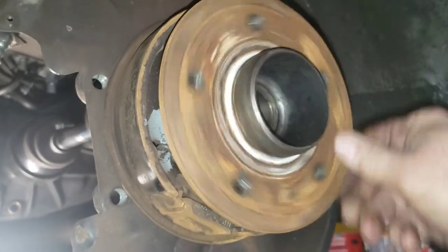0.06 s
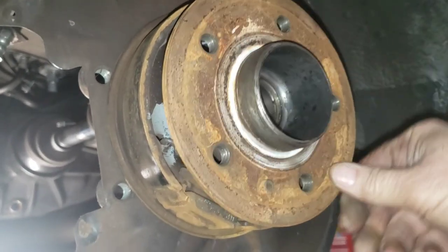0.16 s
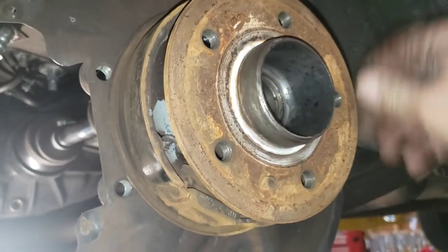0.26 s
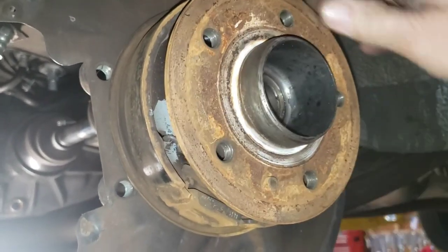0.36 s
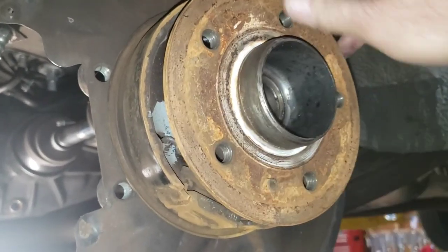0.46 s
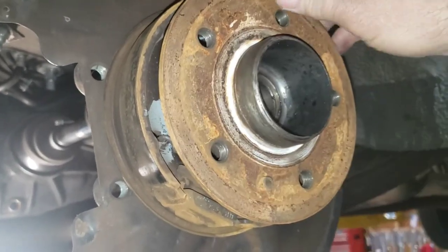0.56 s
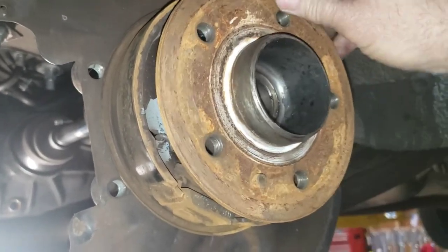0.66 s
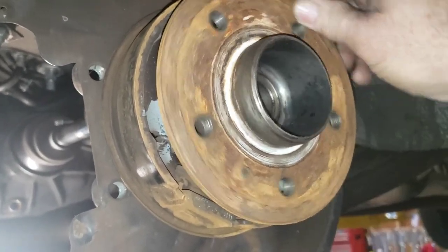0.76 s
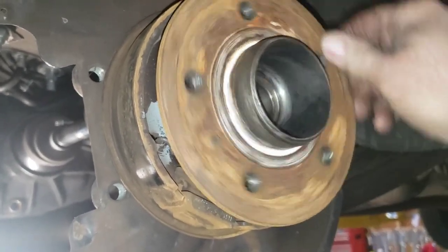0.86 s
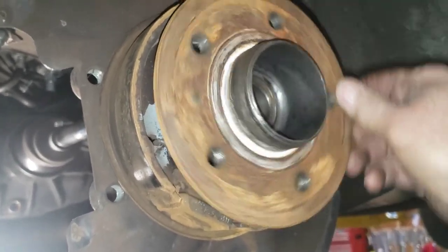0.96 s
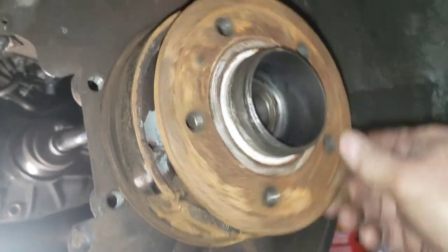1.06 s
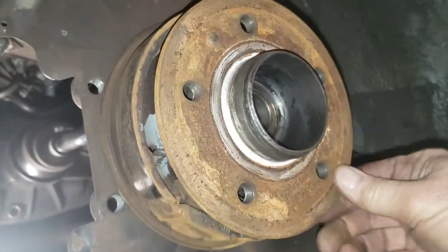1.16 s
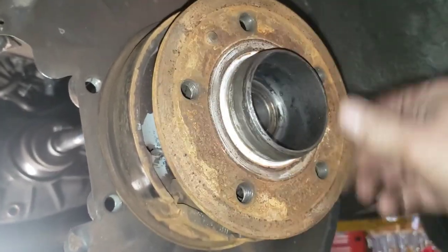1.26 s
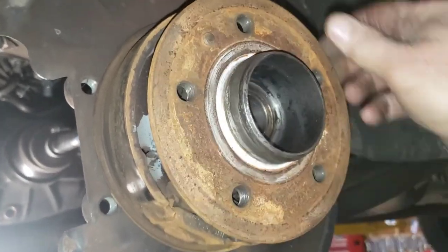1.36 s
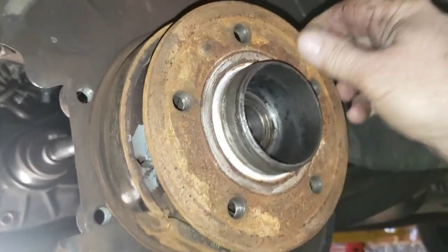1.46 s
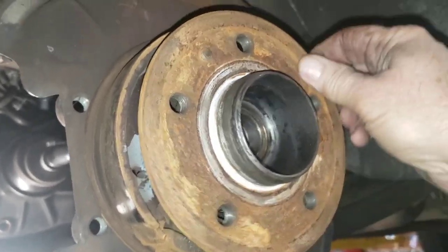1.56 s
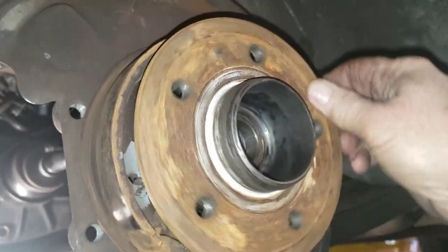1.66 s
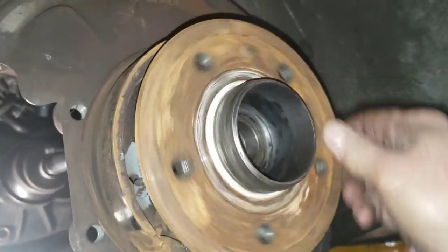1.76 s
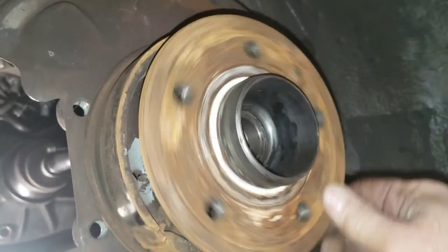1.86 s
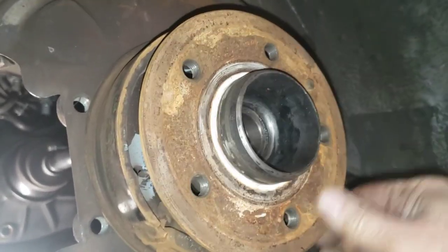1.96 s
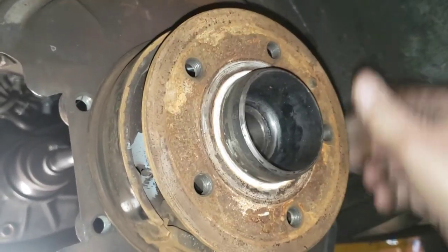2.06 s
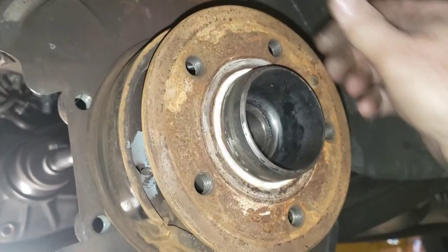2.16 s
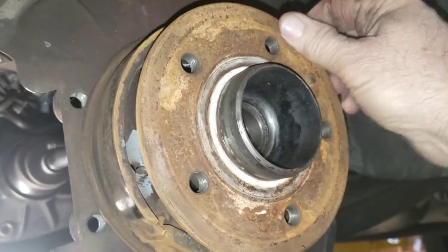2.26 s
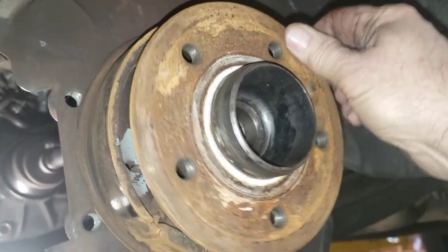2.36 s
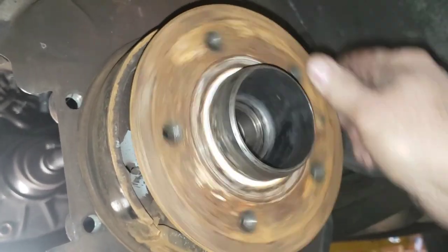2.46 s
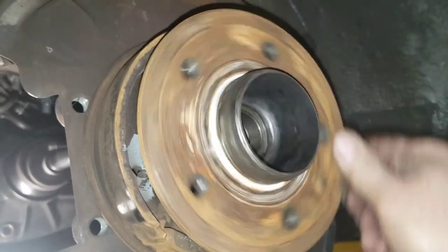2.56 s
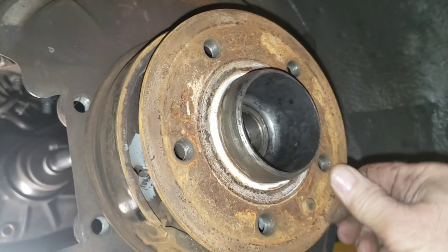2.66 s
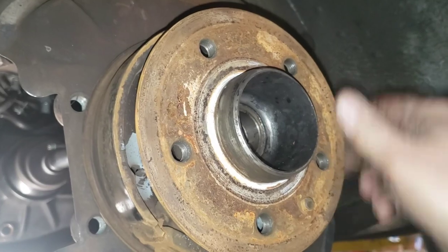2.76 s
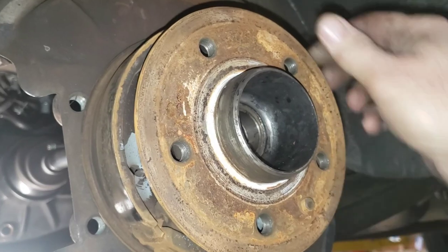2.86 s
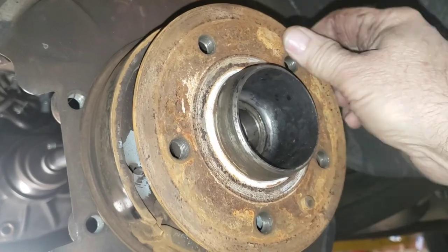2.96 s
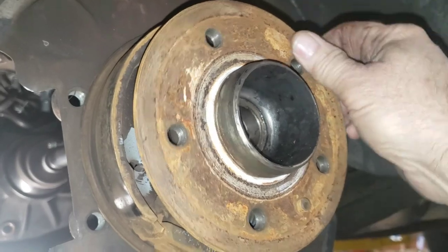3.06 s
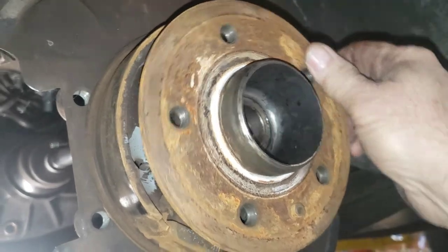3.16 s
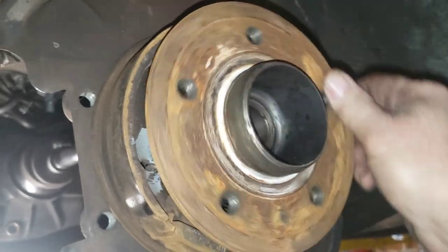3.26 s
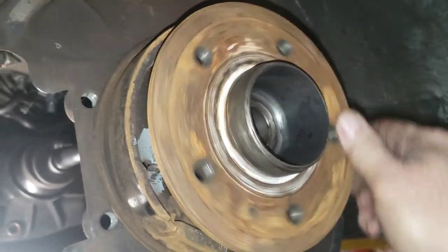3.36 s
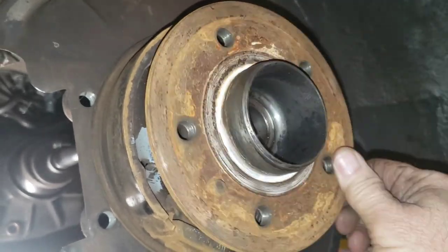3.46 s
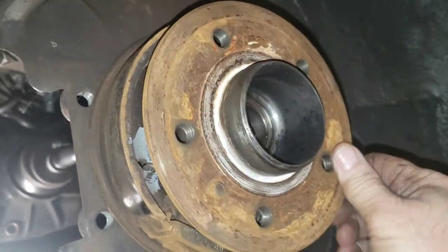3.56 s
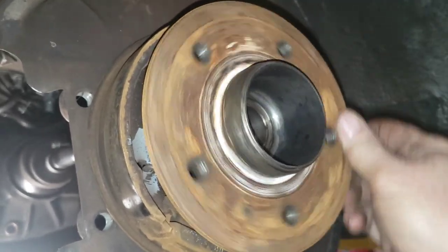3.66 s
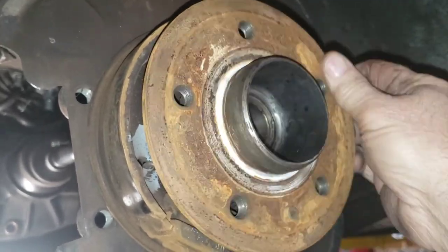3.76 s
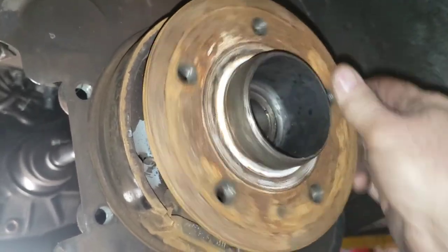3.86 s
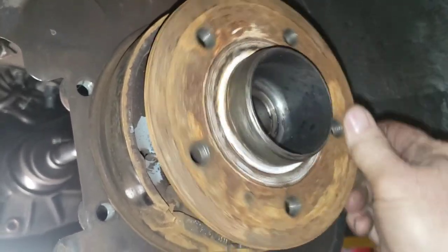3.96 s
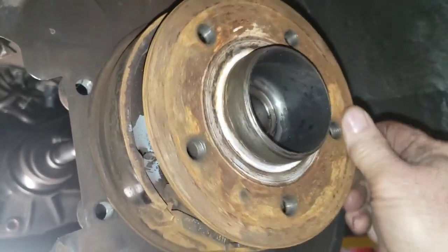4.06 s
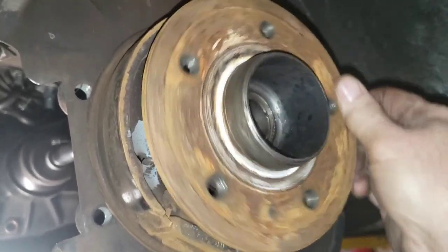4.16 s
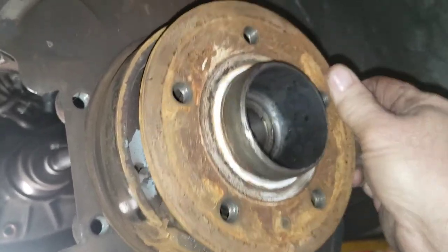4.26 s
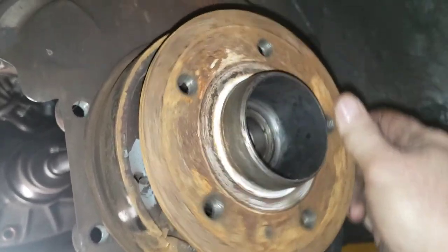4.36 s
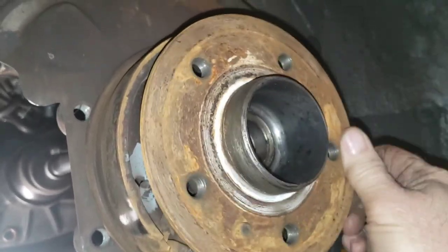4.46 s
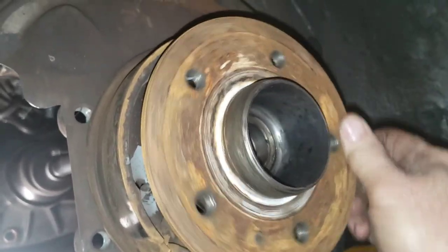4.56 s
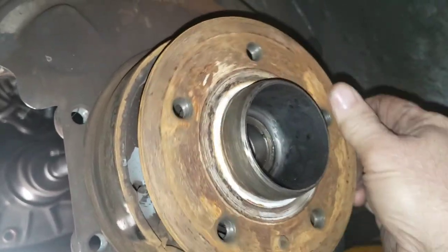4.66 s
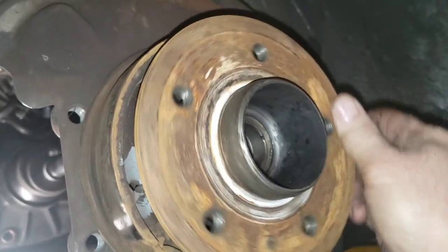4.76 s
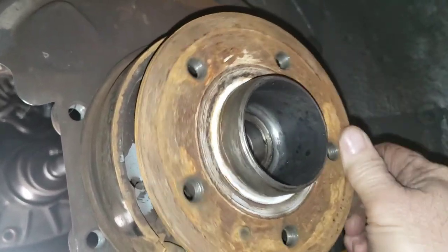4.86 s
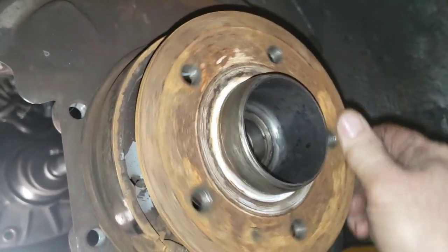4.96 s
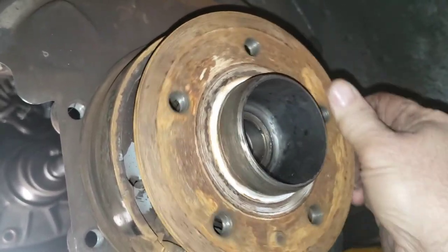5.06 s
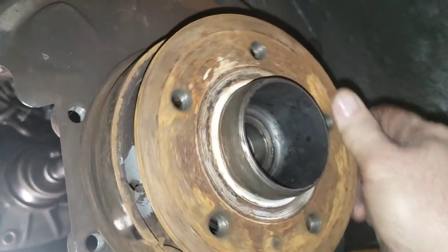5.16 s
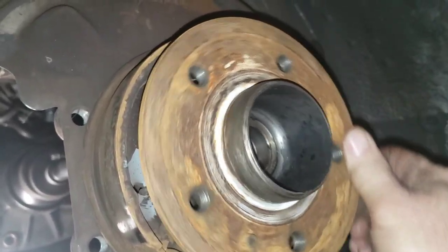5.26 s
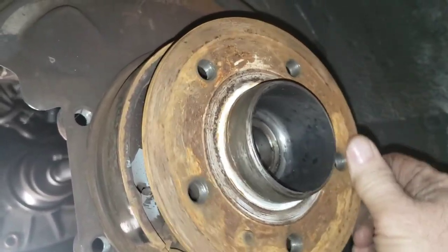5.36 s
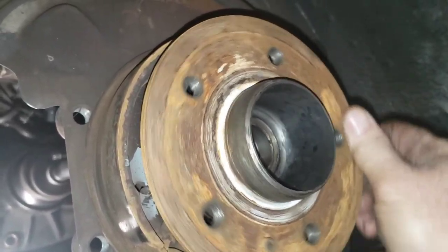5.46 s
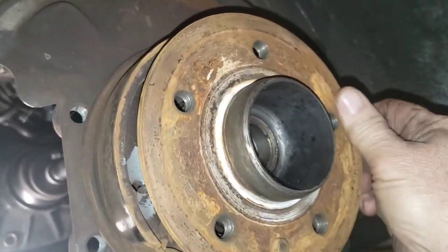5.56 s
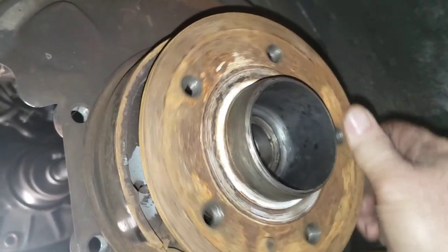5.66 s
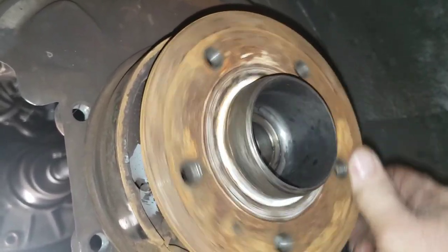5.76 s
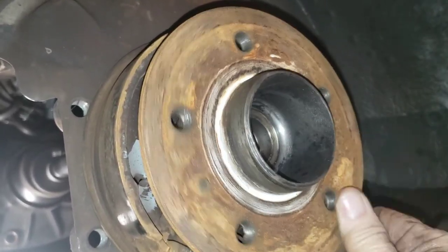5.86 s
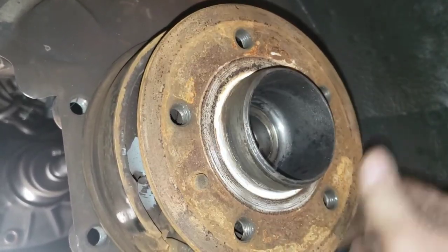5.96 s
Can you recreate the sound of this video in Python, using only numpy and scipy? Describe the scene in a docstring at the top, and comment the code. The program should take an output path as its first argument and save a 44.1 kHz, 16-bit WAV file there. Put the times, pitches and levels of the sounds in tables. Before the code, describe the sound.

A bare iron wheel hub is turned by hand on a worn bearing, heard close up in a garage with faint hiss and little echo. It opens with the loudest spin, a gritty grinding rumble with a squeak, fading by about 0.5 seconds. Light metallic ticks follow, then another spin near 0.9 seconds with ringing knocks and a low hum. Around 1.4 seconds a slow drag makes the metal sing thinly, ending in a small dry click. Further grinding bursts come at about 1.9 and 2.5 seconds, the second with sharp crunches and knocks, and single ticks fall in the gaps. From 3.2 seconds high squeaks lead into a strong stroke, and the hub is then rocked in short, quick turns, about four a second. These crunch, scrape and knock, with occasional soft low tones from the bracket, and continue a little more quietly from 5 seconds until about 6.

```python
"""In a garage, close to a two-port microphone, a hand rocks and spins a bare iron hub on a ruined bearing.
Pitted rollers rumble and grind grit, forcing the modes of the iron, and catch with crunches and squeaks.
Loose rollers tick the flange, which rings thinly; a slow drag makes it sing and a fingertip snaps on it.
Play in the bearing is taken up with knocks, and the bracket sways with low notes under a push."""
import sys
import numpy as np
from scipy import signal
from scipy.fft import rfft, irfft, next_fast_len
from scipy.io import wavfile
from scipy.ndimage import uniform_filter1d

SR = 44100
rng = np.random.default_rng(int(sys.argv[2]) if len(sys.argv) > 2 else 0)


def wav_record(signal):
    """Record a signal, one row per channel, as 16-bit PCM in the file named by sys.argv[1]."""
    frames = np.transpose(np.atleast_2d(signal))
    bounded = np.clip(frames, -1, 1)
    # unit amplitude maps onto the largest positive 16-bit level
    quanta = np.round(bounded * 32767).astype(np.int16)
    wavfile.write(sys.argv[1], SR, quanta)


N = 264452
T = np.arange(N) / SR


def gain_of(db):
    return 10 ** (np.asarray(db) / 20)


def unit_rms(x):
    return x / np.sqrt(np.mean(x ** 2) + 1e-20)


def curve_at(points, hz):
    point_hz, value = np.transpose(points)
    return np.interp(np.log(hz + 1), np.log(point_hz + 1), value)


def add(mix, start_s, sound):
    part = mix[:, round(start_s * SR):][:, :sound.shape[1]]
    part += sound[:, :part.shape[1]]


def resonate(x, hz, width_hz):
    """Damped resonance: one mode with a peak gain near 1."""
    radius = np.exp(-np.pi * width_hz / SR)
    pole = radius * np.exp(2j * np.pi * min(hz, 16000) / SR)
    return 2 * signal.lfilter([1 - radius], [1, -pole], x).real


def coloured(x, gain):
    """Linear filtering: the spectrum is multiplied by gain(hz)."""
    size = next_fast_len(N + SR)
    return irfft(rfft(x, size) * gain(np.fft.rfftfreq(size, 1 / SR)), size)[..., :N]


def stroke_level_db(t, offset_db, bright_share, fade_db_per_s, steepness):
    """Incoherent addition: hand strokes run up, hold and die away, and their powers sum."""
    # full_speed_s, hold_s, level_db, brightness_db, rise_db_per_s (at steepness 1)
    strokes = [(0.0, 0.12, -30, 2, 295), (0.541, 0.014, -69, -1, 211), (0.78, 0.086, -54.5, -6.5, 1200),
               (0.853, 0.15, -38, -1.5, 304), (1.102, 0.1, -54, -1.5, 181),
               (1.358, 0.059, -59.5, 11.5, 599), (1.805, 0.089, -55.5, 2, 222),
               (1.878, 0.078, -49.5, -2.5, 485), (2.469, 0.01, -60, -1, 149),
               (2.519, 0.11, -42.5, -1, 600.5), (3.078, 0.048, -66.5, 2.5, 407.5),
               (3.253, 0.11, -50, 2, 1500), (3.445, 0.028, -39, 2, 350), (3.74, 0.054, -43.5, -3.5, 326),
               (3.969, 0.067, -51.5, -3, 612), (4.1, 0.0093, -56.5, -5.5, 902),
               (4.22, 0.061, -46.5, -0.5, 885), (4.45, 0.032, -49.5, -2.5, 1190),
               (4.676, 0.043, -43.5, 1, 788.5), (4.884, 0.05, -53.5, -4, 297.5),
               (5.011, 0.14, -53.5, -6, 905), (5.23, 0.1, -53.5, -3.5, 291), (5.516, 0.093, -53.5, -4, 380),
               (5.714, 0.0033, -56, -5, 170), (5.82, 0.076, -61.5, -6, 213),
               (5.928, 0.0059, -51.5, -4.5, 262)]
    full_s, hold_s, level_db, bright_db, rise = np.transpose(strokes)[..., None]
    run_up_db = steepness * rise * np.maximum(full_s - t, 0)
    fade_db = fade_db_per_s * np.maximum(t - full_s - hold_s, 0)
    db = level_db + offset_db + bright_share * bright_db - run_up_db - fade_db
    return 10 * np.log10(np.sum(gain_of(2 * db), axis=0) + 1e-12)


def rolling(grains_per_s=16000, spread_db=1.3, clump_db=1.5, patchy_db=4,
            slips_per_s=45, slip_s=0.027, slip_size=0.41):
    """Shot noise: uneven grit is crushed in clumps at two sides of the race."""
    # Spectral shape of the grinding: frequency_hz, density_db
    spectrum = [(25, -29.5), (60, -22), (102, 7), (206, -2), (400, -3), (600, 9), (863, 7), (1100, 6.5),
                (1330, -4.5), (2300, -10), (2910, -14), (4490, -8.5), (8590, -17.5), (14400, -18.5),
                (16000, -24.5)]
    # Thud, growl, rumble, grinding, dry hiss: offset_db, bright_share, fade_db_per_s, steepness
    layers = [(-17.5, -2, 76.5, 0.65), (-9, -0.79, 81.5, 1.27), (-7, -0.83, 173.5, 0.91),
              (-3.5, 0.33, 196.5, 0.72), (-12.5, 0.67, 266, 0.9)]
    sizes = gain_of(spread_db * np.minimum(rng.exponential(1, N), 5))
    sizes *= rng.random(N) < grains_per_s / SR
    clumps = unit_rms(uniform_filter1d(uniform_filter1d(rng.standard_normal(N), 300), 300))
    grains = sizes * gain_of(clump_db * clumps) * rng.standard_normal((2, N))
    hz, t, frames = signal.stft(unit_rms(grains), SR, nperseg=512, noverlap=384)
    shape_db = curve_at(spectrum, hz)
    layer_index = np.interp(hz, [90, 170, 350, 520, 1200, 1600, 6000, 8000], [0, 1, 1, 2, 2, 3, 3, 4])
    level_db = np.zeros(frames.shape[1:])
    for k, layer in enumerate(layers):
        share = np.clip(1 - abs(layer_index - k), 0, 1)
        band_db = 10 * np.log10(np.mean((share > .5) * gain_of(2 * shape_db)))
        level_db += share[:, None] * (stroke_level_db(t, *layer) - band_db)
    # Small slips crackle in the treble.
    kicks = rng.exponential(slip_size, len(t)) * (rng.random(len(t)) < slips_per_s * t[1])
    slips = signal.lfilter([1], [1, -np.exp(-t[1] / slip_s)], kicks)
    level_db += np.clip(hz / 7000, 0, 1)[:, None] * 20 * np.log10(unit_rms(1 + slips))
    # The contact patch wanders, so its colour drifts.
    drift = uniform_filter1d(rng.standard_normal(level_db.T.shape), size=16, axis=0)
    patches = unit_rms(uniform_filter1d(drift, size=2, axis=1)).T
    level_db += patchy_db * np.clip(hz / 2500, .2, 1)[:, None] * patches
    frames = frames * gain_of(shape_db[:, None] + level_db)
    return signal.istft(frames, SR, nperseg=512, noverlap=384)[1][:, :N]


def hub(force, wander_db=2.5, speed_share=.3):
    """Forced vibration: iron modes ring over the contact noise, fed unevenly as the load moves round."""
    # Modes of hub, knuckle and bracket: pitch_hz
    pitches = [115, 161, 207, 255, 305, 551, 718, 789, 881, 1026, 1091, 1251, 1717, 2731, 3074, 3496, 3780,
               4489, 8150, 9300, 10833, 14100]
    # Resonance at each pitch: width_hz, gain_db
    modes = [(5, 8.5), (3.47, 11), (8, 7), (10, 10), (3, 7), (7, 6), (6, 7.5), (5, 10.5), (5, 14.5), (8, 8),
             (12.1, 13.5), (4.506, 13), (14, 5), (15.9, 8.5), (17.9, 4), (26.4, 9.5), (24, 4), (17.9, 5.5),
             (49.1, 5.5), (39.7, 6), (44.4, 17.5), (200, 5.5)]
    steps_s = np.arange(0, 6.2, .11)
    speed_db = speed_share * np.clip(stroke_level_db(steps_s, 45, 0, 170, 0.93), -20, 10)
    feeds = rng.standard_normal((len(modes), len(steps_s)))
    out = force.copy()
    for hz, (width_hz, db), feed in zip(pitches, modes, feeds):
        feed_db = wander_db * feed + (hz > 9000) * speed_db  # fast strokes wake the highest modes
        out += resonate(force * gain_of(db + np.interp(T, steps_s, feed_db)), hz, width_hz)
    return out


def room_noise(level_db=-67):
    """Noise floor: garage air and microphone hiss, partly correlated between the channels."""
    # frequency_hz, density_db
    spectrum = [(25, 18), (90, 9.5), (400, -26.5), (2000, -6.5), (5000, -22.5), (9000, -24.5),
                (12500, -15.5), (16000, -17)]
    common, separate = rng.standard_normal((2, N))
    noise = np.array([common, 0.36 * common + separate])
    return gain_of(level_db) * unit_rms(coloured(noise, lambda hz: gain_of(curve_at(spectrum, hz))))


def catches(trim_db=-10, scrape_q=10, crack_q=1.5, widest_hz=800, rise_s=.0016):
    """Stick-slip friction: a roller catching in a pit gives a pitched scrape inside a wide crack."""
    # start_s, level_db, pitch_hz, t60_s, crack_over_scrape_db
    events = [(0.077, -12.5, 2740, 0.064, -12.5), (0.172, -34.5, 11040, 0.077, 8.5),
              (0.7001, -51, 6070, 0.2, 3.5), (0.78, -56, 3640, 0.035, 10), (0.828, -37, 3600, 0.058, 9.5),
              (0.945, -27.5, 2320, 0.32, -6), (0.9358, -40, 4270, 0.056, 16),
              (1.314, -57.5, 4340, 0.044, 17), (1.8792, -31, 4960, 0.096, -1),
              (2.369, -54.5, 3980, 0.022, 19.5), (2.436, -51, 4300, 0.098, 7.5),
              (2.5105, -36.5, 7800, 0.081, 16.5), (2.5436, -24.5, 4400, 0.15, -2),
              (2.5754, -24.5, 4350, 0.049, 0.5), (2.6202, -34.5, 5270, 0.035, 4),
              (3.0642, -42.5, 4710, 0.081, -3), (3.2533, -32, 14000, 0.11, -1.5),
              (3.289, -20.5, 5070, 0.034, -26), (3.322, -19, 13400, 0.038, -23),
              (3.3781, -31, 3080, 0.1, 6), (3.414, -43, 7000, 0.048, 9), (3.4371, -19, 14800, 0.064, -19),
              (3.6603, -42, 4200, 0.14, -2), (3.7223, -44, 4830, 0.53, 10.5),
              (3.803, -45, 3830, 0.14, 13.5), (3.863, -39.5, 4300, 0.042, 10.5),
              (3.963, -34, 4730, 0.035, 1.5), (3.976, -26.5, 12400, 0.079, -31),
              (4.099, -41.5, 4700, 0.025, 6.5), (4.2246, -30, 6200, 0.085, 0.5),
              (4.451, -42.5, 3710, 0.22, 5), (4.651, -60, 11000, 0.5, 11), (4.6944, -39, 9400, 0.018, 21.5),
              (4.787, -48.5, 10600, 0.055, 14), (4.8755, -45, 3740, 0.051, 5),
              (4.916, -46, 10600, 0.053, -8), (4.964, -54, 10600, 0.049, 12),
              (5.0687, -44.5, 3840, 0.79, 7.5), (5.1334, -44.5, 3200, 0.06, 18),
              (5.5041, -36, 10530, 0.15, -13), (5.573, -38, 9000, 0.22, 5), (5.9118, -48, 4530, 0.22, 9),
              (5.9328, -35, 4640, 0.066, 1.5), (5.9661, -37.5, 4800, 0.14, 0.5)]
    out, t = np.zeros((2, N)), np.arange(8000) / SR
    for start_s, db, hz, t60, crack_db in events:
        scrape_noise, crack_noise = rng.standard_normal((2, 2, len(t)))
        envelope = (1 - np.exp(-t / rise_s)) * gain_of(db + trim_db - 60 * t / min(t60, .4))
        width_hz = min(hz / scrape_q, widest_hz)
        scrape = unit_rms(resonate(resonate(scrape_noise, hz, width_hz), hz, width_hz))
        crack = unit_rms(resonate(crack_noise, hz, hz / crack_q))
        add(out, start_s, envelope * (scrape + gain_of(crack_db) * crack))
    return out


def flange(force, shake_db=-14, rub_db=4, click_db=30, drag_db=10, rub_rise_s=0.00067, rub_s=0.029):
    """Lightly damped resonance: ticks rub the flange briefly, a drag for longer; grinding shakes it."""
    # Loose rollers ticking the flange: start_s, level_db
    ticks = [(0.19, -38.5), (0.503, -52.5), (0.597, -51.5), (0.755, -45), (1.263, -46.5), (2.016, -43.5),
             (2.2173, -50), (2.3033, -46.5), (2.7593, -42), (3.002, -47)]
    # The slow drag that keeps it singing: time_s, level_db
    drag_curve = [(1.345, -69), (1.365, -47), (1.435, -53.5), (1.465, -60), (1.532, -51)]
    # Flange modes: pitch_hz, ticked_db, dragged_db, ring_s (time to fall about 80 dB)
    modes = [(4484, -6, -20, 0.09), (6790, -3, -3, 0.25), (12570, -19, 2, 0.12)]
    out, rubs, t = np.zeros((2, N)), np.zeros((2, N)), np.arange(SR // 8) / SR
    rub_envelope = (1 - np.exp(-t / rub_rise_s)) * np.exp(-t / rub_s)
    for start_s, db in ticks:
        rub_noise, click_noise = rng.standard_normal((2, 2, len(t)))
        add(rubs, start_s, gain_of(db + rub_db) * rub_envelope * rub_noise)
        click = unit_rms(resonate(click_noise, hz=6500, width_hz=6000))
        add(out, start_s, gain_of(2 * db + click_db - 60 * t / .03) * click)
    time_s, level_db = np.transpose(drag_curve)
    drag = rng.standard_normal((2, N)) * gain_of(drag_db + np.interp(T, time_s, level_db))
    drag *= (T > time_s[0]) & (T < time_s[-1])
    for hz, ticked_db, dragged_db, ring_s in modes:
        drive = gain_of(ticked_db) * (rubs + gain_of(shake_db) * force) + gain_of(dragged_db) * drag
        out += resonate(drive, hz, 3 / ring_s) * np.sqrt(SR * ring_s / 20) / 4
    return out


def knocks(ring_db=-6, blow_db=-3, blow_t60_s=0.047, rise_s=.001):
    """Impact and free decay: play closes with a blow of steel on steel, and the struck part rings."""
    # start_s, level_db, pitch_hz, t60_s
    events = [(0.702, -54.5, 792, 0.67), (0.867, -35.5, 1076, 0.26), (0.996, -28, 882, 0.22),
              (1.215, -51, 544, 0.13), (1.313, -54, 842, 0.5), (1.876, -41, 1096, 0.22),
              (1.871, -42.5, 440, 0.15), (2.439, -52, 680, 0.15), (2.514, -36.5, 1096, 0.18),
              (2.624, -31.5, 1083, 0.16), (2.621, -36.5, 230, 0.28), (3.722, -43, 1066, 0.6),
              (4.095, -41.5, 560, 0.17), (4.873, -43, 1110, 0.029), (5.004, -46, 565, 0.38),
              (5.218, -37, 1136, 0.15), (1.404, -50.5, 4490, 0.34), (1.454, -53.5, 255, 0.088),
              (4.226, -48, 1245, 0.46), (4.678, -47, 1250, 0.78), (3.451, -34, 229, 0.23),
              (3.746, -37, 223.4, 0.27), (4.452, -45, 237.6, 0.57), (4.669, -43.5, 357, 0.37),
              (5.006, -46.5, 240, 0.11), (5.216, -38, 673, 0.07), (5.448, -51.5, 230, 0.2)]
    out, t = np.zeros((2, N)), np.arange(12000) / SR
    for start_s, db, hz, t60 in events:
        noise = rng.standard_normal((2, len(t)))
        band = unit_rms(resonate(resonate(noise, hz, width_hz=hz), hz, width_hz=hz))
        blow = band * gain_of(blow_db - 60 * t / blow_t60_s)
        ring = np.sin(2 * np.pi * hz * t) * gain_of(ring_db - 60 * t / min(t60, .6)) * [[1], [.3]]
        add(out, start_s, (1 - np.exp(-t / rise_s)) * gain_of(db) * (blow + ring))
    return out


def bracket_sways(rise_s=0.011, t60_s=0.59):
    """Damped oscillation: the pushed bracket gives a low note that swells and dies."""
    # start_s, level_db, pitch_hz
    pushes = [(0.85, -42.5, 76), (0.991, -40, 160.8), (1.01, -38.5, 89.4), (3.445, -40, 202),
              (4.226, -42, 115.2), (4.681, -40, 115.5), (5.079, -43.5, 122.1)]
    out, t = np.zeros((2, N)), np.arange(SR // 2) / SR
    for start_s, db, hz in pushes:
        envelope = (1 - np.exp(-t / rise_s)) * gain_of(db - 60 * t / t60_s)
        add(out, start_s, envelope * np.sin(2 * np.pi * hz * t) * [[1], [0]])  # near side only
    return out


def finger_snap(click_db=9, click_s=.00009, flick_t60_s=0.05):
    """Impact transient: a fingertip on the flange gives a dry click and a dull flick falling in pitch."""
    # start_s, level_db
    snaps = [(1.5578, -41)]
    start_s, db = snaps[0]
    out, t = np.zeros((2, N)), np.arange(1600) / SR
    flick_hz = 170 + 900 * np.exp(-t / 0.0035)
    envelope = np.minimum(t / .001, 1) * gain_of(db - 60 * t / flick_t60_s)
    flick = envelope * np.sin(2 * np.pi * np.cumsum(flick_hz) / SR)
    click = gain_of(db + click_db) * np.sin(t / click_s) * np.exp(-.5 * t / click_s)
    add(out, start_s, (flick + click) * [[1], [0]])
    return out


def garage_echoes():
    """Reverberation: sparse reflections of random sign die away by band, scaled to unit energy."""
    # frequency_hz, t60_s
    decay = [(100, 0.064), (500, 0.031), (2000, 0.41), (10000, 0.22)]
    taps = rng.choice([-1., 1.], (2, SR // 2)) * (rng.random((2, SR // 2)) < .06)
    taps[:, :200] = 0  # gap before the first reflection
    hz, t, frames = signal.stft(taps, SR, nperseg=128)
    tail = signal.istft(frames * gain_of(-60 * t / curve_at(decay, hz)[:, None]), SR, nperseg=128)[1]
    return tail / np.linalg.norm(tail, axis=1, keepdims=True)


def microphone_ports(sides, wet_db=-12):
    """Partial coherence: the left port faces the hub's near side; the right hears it late, with the far."""
    # Near side's amplitude in the right port: frequency_hz, share
    coherence = [(30, 0.88), (100, 0.99), (300, 0.91), (1000, 0.68), (4000, 0.15), (15000, 0.22)]
    # Phase lead of the left port: frequency_hz, lead_rad
    lead = [(0, 0), (2150, 1.3), (2930, 1.4), (3450, 7.9), (4650, 15.1), (5170, 15.1), (9300, 13.8),
            (10200, 19.3), (15800, 18.7)]
    # Level difference of the ports: frequency_hz, left_minus_right_db
    balance = [(60, 2.5), (150, 1.5), (380, -0.5), (950, 2), (2380, 11), (5980, 7.5), (15000, 4.5)]
    near, far = sides + gain_of(wet_db) * signal.fftconvolve(sides, garage_echoes(), axes=1)[:, :N]
    delay = lambda hz: np.exp(-1j * np.interp(hz, *np.transpose(lead)))
    right = coloured(near, lambda hz: curve_at(coherence, hz) * delay(hz))
    right += coloured(far, lambda hz: np.sqrt(1 - curve_at(coherence, hz) ** 2))
    return coloured(np.array([near, right]), lambda hz: gain_of(np.outer([.5, -.5], curve_at(balance, hz))))


def scene():
    """Superposition: contact forces drive hub and flange, and all sources sum at the microphone."""
    force, blows = rolling() + catches(), knocks()
    iron = hub(force + gain_of(-11.5) * blows)
    sides = iron + blows + bracket_sways() + flange(force) + finger_snap()
    return microphone_ports(sides) + room_noise()


def record(dry, low_hz=60, high_hz=15950):
    """Band limiting: the deepest bass and the highest treble are filtered out."""
    thin = signal.lfilter(*signal.butter(2, low_hz, "high", fs=SR), dry)
    lowpass = signal.firwin(1023, high_hz, window=("kaiser", 9), fs=SR)
    return signal.oaconvolve(thin, lowpass[None], "same")


dry = scene()
out = record(dry)
wav_record(out)
```